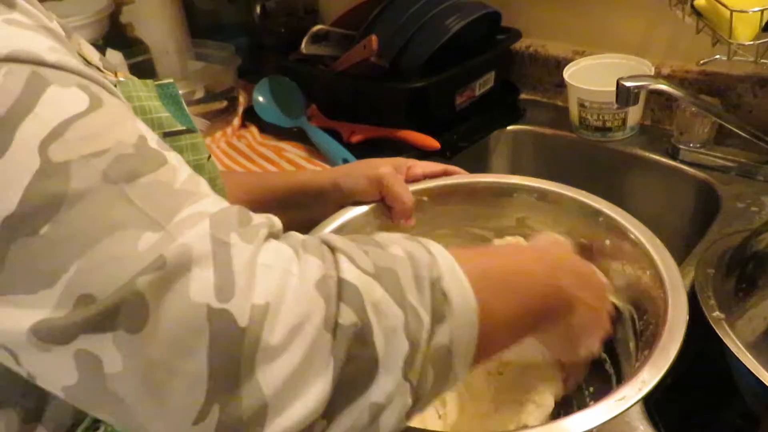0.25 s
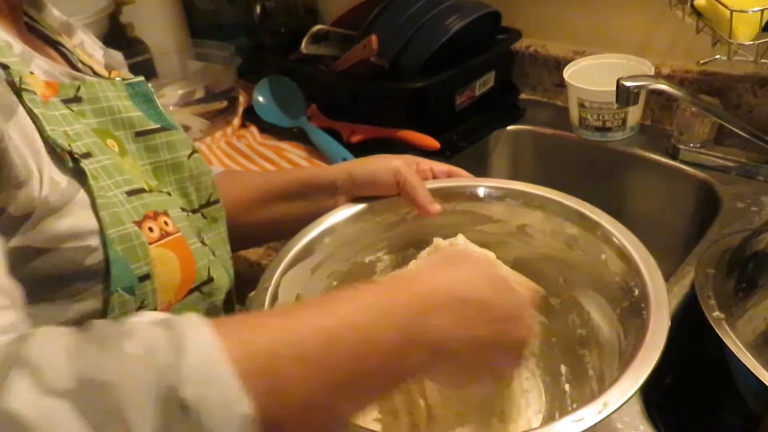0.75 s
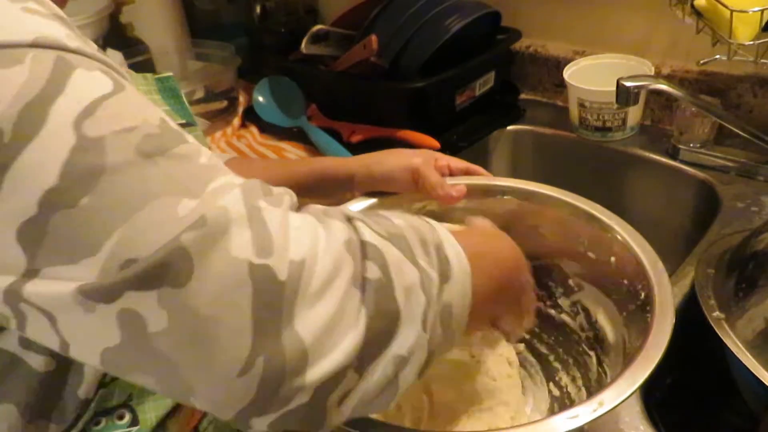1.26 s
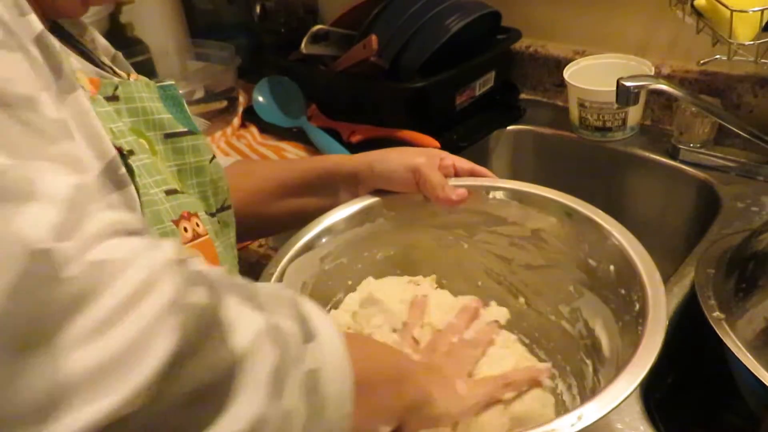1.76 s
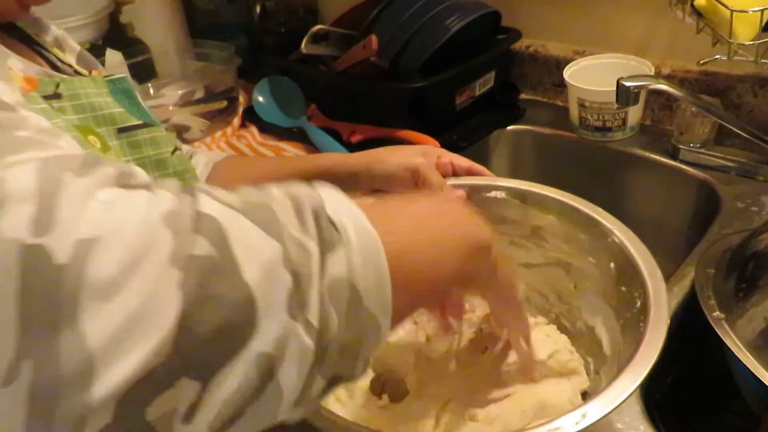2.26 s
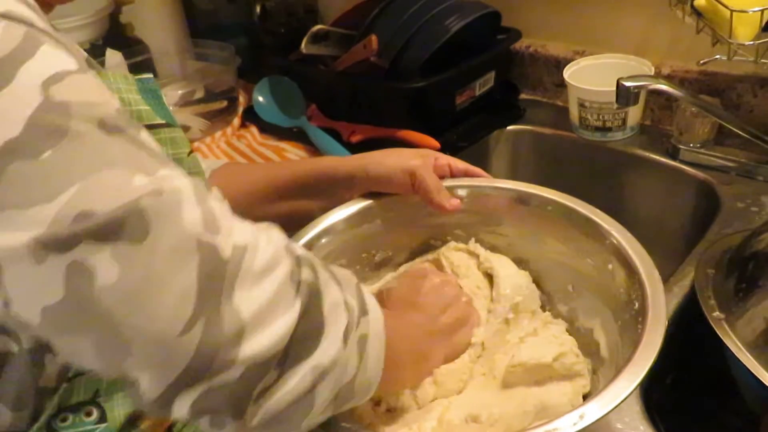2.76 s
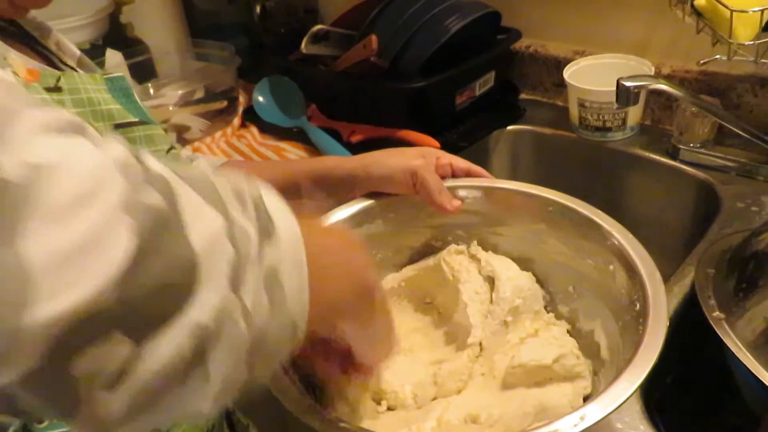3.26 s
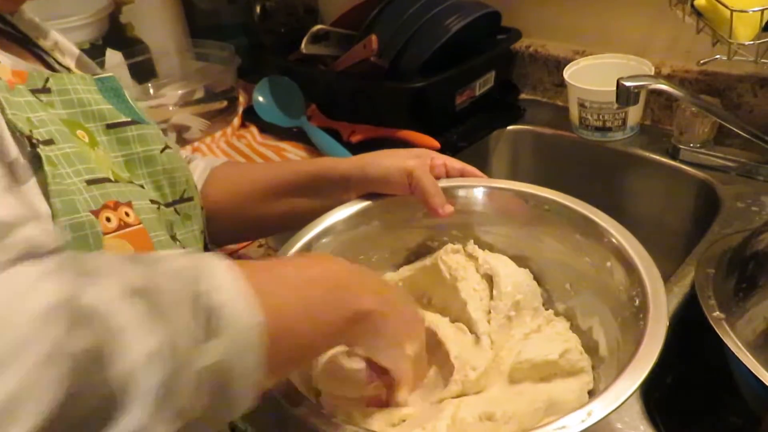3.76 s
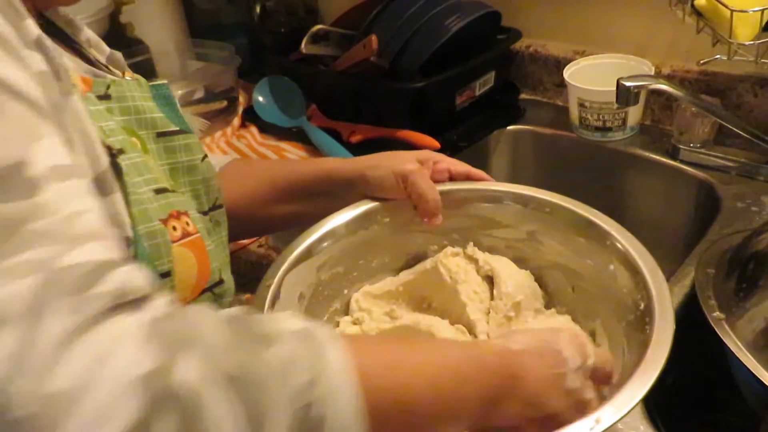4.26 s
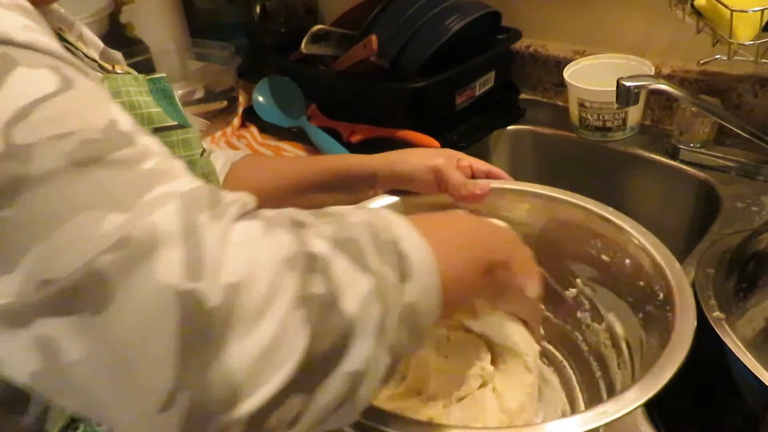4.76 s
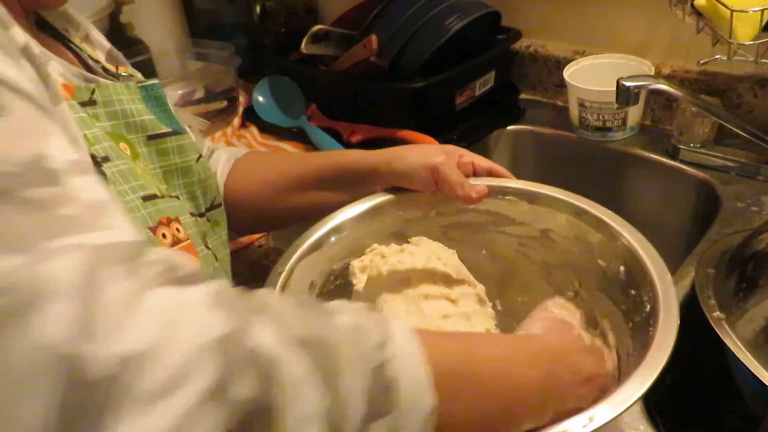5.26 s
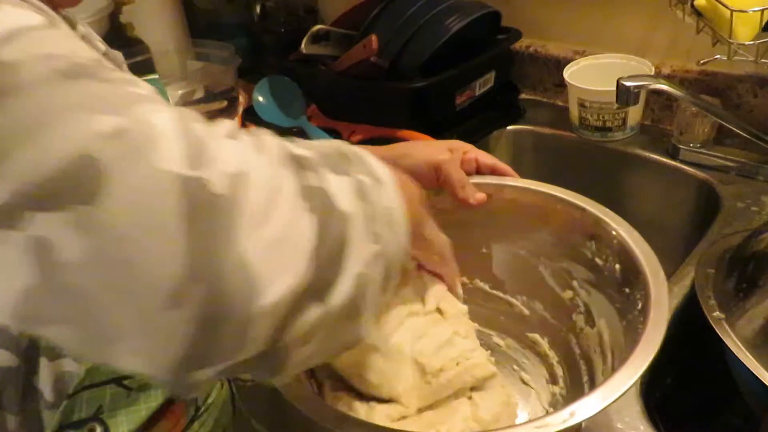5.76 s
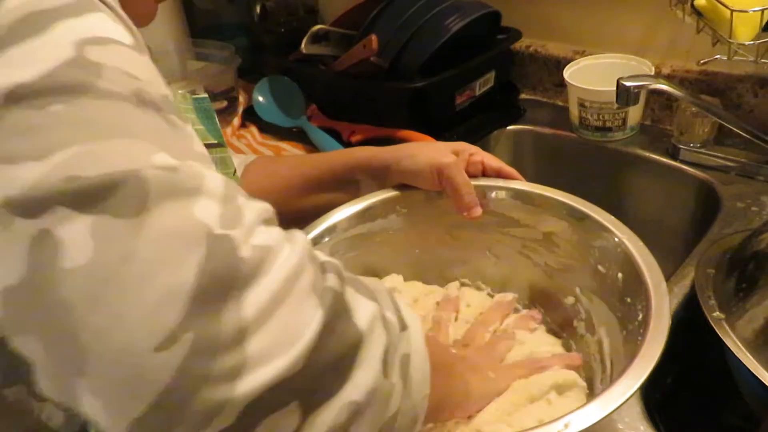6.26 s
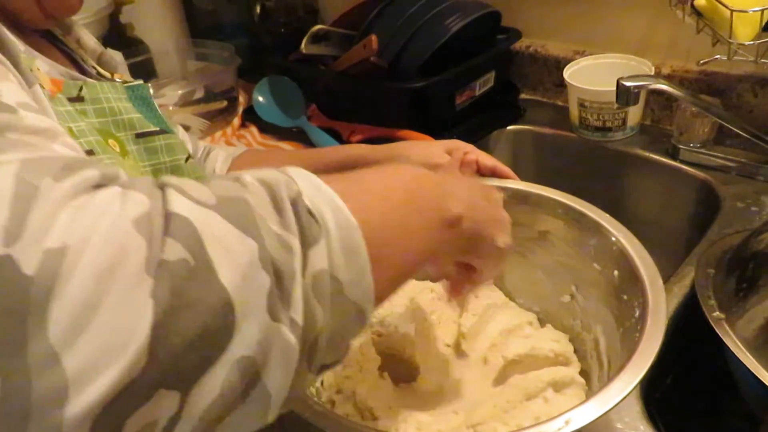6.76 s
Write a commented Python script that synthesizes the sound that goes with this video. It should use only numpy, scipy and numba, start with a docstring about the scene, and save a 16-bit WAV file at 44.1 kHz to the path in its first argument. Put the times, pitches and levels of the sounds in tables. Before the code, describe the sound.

Hands knead sticky dough in a large steel bowl beside a kitchen sink. Pushes thump the bowl with a dull, short metallic boom, hardest just after two seconds. A quieter middle has soft pats, rubbing and wet snaps, then the thumps return near five seconds. Close stereo microphones, a small hard kitchen, low hum and a faint engine far outside.

```python
"""Dough is kneaded by hand in a big steel bowl on the edge of a kitchen sink, heard by two close microphones.
Each push thumps the bowl down: damped modes ring over a crack and a longer wash of noise.
Between pushes come soft pats, the rub of dough and sleeve, a faint squeak, and the fizz and snaps of tearing
dough, all built from noise, clicks and small ringing pockets, with a short tail from the hard kitchen.
Far outside an engine drones, over a low hum and room air; a limiter ducks the level at the hardest thumps."""
import sys
import numpy as np
from scipy import signal
from scipy.fft import rfft, irfft, next_fast_len
from scipy.io import wavfile
from scipy.ndimage import uniform_filter1d, minimum_filter1d
from numba import njit

SR = 44100
rng = np.random.default_rng(int(sys.argv[2]) if len(sys.argv) > 2 else 0)


def dump(signal):
    """Clip the signal to [-1, 1] and save it as 16-bit WAV at the path in sys.argv[1]."""
    limited = np.clip(np.atleast_2d(signal).T, -1, 1)
    pcm = np.round(limited * 32767).astype(np.int16)
    wavfile.write(sys.argv[1], SR, pcm)


N = 309890  # samples
TIME = np.arange(N) / SR  # seconds


def undb(db):
    """Decibels to gain."""
    return 10 ** (np.asarray(db) / 20)


def unit(x):
    """Scale to rms 1."""
    return x / np.sqrt(np.mean(x ** 2))


def colour(x, points):
    """Filter by (Hz, dB) points joined on a log-frequency axis."""
    hz, db = np.transpose(points)
    size = next_fast_len(x.shape[-1] + 2048)
    f = np.maximum(np.fft.rfftfreq(size, 1 / SR), 1)
    gain = undb(np.interp(np.log(f), np.log(hz), db))
    return irfft(rfft(x, size) * gain, size)[..., :x.shape[-1]]


# How far diffuse sound differs between the two close microphones.
# Each row: frequency in Hz, side filter gain in dB.
MICROPHONE_SPREAD = [(60, -27), (110, -23), (200, -8.5), (380, -8), (700, -12), (1290, -9.5), (2380, -8.5),
                     (4400, -8.5), (8120, -5.5), (15000, 0.5)]


def widen(mid, side):
    """Left and right at the two microphones: alike in the bass, unrelated in the treble."""
    return mid + np.array([[1], [-1]]) * colour(side, MICROPHONE_SPREAD)


def diffuse(count, width=1):
    """White noise arriving from all around; a smaller width draws it toward the centre."""
    mid, side = rng.standard_normal((2, count))
    return widen(mid, width * side)


def fade(t, t60):
    """Exponential decay, falling 60 dB in t60 seconds."""
    return np.exp(-np.log(1000) * t / t60)


def walk(rate):
    """Slow chance with a spread near 1: random values, rate of them per second, joined by lines."""
    knots = rng.standard_normal(2048)
    return np.interp(TIME * rate, np.arange(len(knots)), knots)


def swell(middle, length):
    """A movement gathers speed and comes to rest again."""
    return np.sin(np.pi * np.clip((TIME - middle) / length + .5, 0, 1))


def crackle(rate, spread_db):
    """Tiny bonds breaking at random, rate of them per second: clicks of very uneven size."""
    sizes = undb(spread_db * np.minimum(rng.exponential(size=N), 5))
    mid, side = rng.standard_normal((2, N)) * sizes * (rng.random(N) < rate / SR)
    return unit(widen(mid, side))


def pockets(rate, low_hz, high_hz, cycles, spread_db):
    """Tiny air pockets open at random, each ringing for a few cycles at a pitch of its own."""
    out, t = np.zeros((2, N)), np.arange(SR // 20) / SR
    for when, pitch, size, pan in rng.random((int(rate * N / SR), 4)):
        hz = low_hz * (high_hz / low_hz) ** pitch
        envelope = t * hz * fade(t, cycles / hz)
        ring = undb(spread_db * size) * np.sin(2 * np.pi * hz * t) * envelope
        left_right = np.array([[1 + pan / 2], [1.5 - pan / 2]])
        add(out, left_right * ring, when * TIME[-1])
    return unit(out)


def resonate(x, hz, width_hz):
    """Steep band-pass: one resonance applied twice."""
    b, a = signal.iirpeak(min(hz, SR / 3), hz / min(width_hz, SR / 4), fs=SR)
    return signal.lfilter(b, a, signal.lfilter(b, a, x))


def add(track, sound, start):
    """Mix a sound into the track at a time in seconds."""
    i = max(int(start * SR), 0)
    track[:, i:i + sound.shape[-1]] += sound[..., :N - i]


# Air of the still kitchen. Each row: frequency in Hz, relative level in dB per Hz.
KITCHEN_AIR = [(12, -40), (20, -7), (65, 0), (109, -7), (144, -19.5), (213, -6), (274, -26), (342, -10),
               (580, -23), (788, -13), (931, -27), (6180, -39), (11400, -47.5), (15500, -68)]


def kitchen_air(level_db=-47):
    """Steady noise from all around, coloured by the still kitchen."""
    return undb(level_db) * unit(colour(diffuse(N), KITCHEN_AIR))


def hum(hz=61.3, waver_hz=.7, level_db=-49, waver_db=1):
    """A low sine, wavering a little in pitch and level."""
    phase = 2 * np.pi * np.cumsum(hz + waver_hz * walk(3.85)) / SR
    return unit(np.sin(phase)) * undb(level_db + waver_db * walk(7.5))


# The engine far outside speeds up, then eases off. Each row: time in seconds, firing rate in Hz.
ENGINE_SPEED = [(0, 57), (.33, 60), (.5, 64), (1, 66), (1.35, 69.5), (2.1, 79), (2.7, 91), (3, 95),
                (3.5, 104), (3.95, 106.5), (4.6, 99), (5.35, 92), (6.1, 81), (7.03, 77)]
# Kitchen resonances where the engine booms. Each row: centre in Hz, half width in Hz, boost in dB.
KITCHEN_MODES = [(66.1, 3.3, 10.5), (87.8, 11.3, 2.5)]


def engine(firing_db=-49, half_order_db=-57.5, waver_db=1.2):
    """Sines at the firing rate and half of it; the first swells as it crosses the room's resonances."""
    hz = np.interp(TIME, *np.transpose(ENGINE_SPEED))
    phase = 2 * np.pi * np.cumsum(hz) / SR
    boom_db = sum(boost * np.exp(-((hz - centre) / width) ** 2) for centre, width, boost in KITCHEN_MODES)
    firing = unit(np.sin(phase)) * undb(firing_db + boom_db + waver_db * walk(8))
    half_order = unit(np.sin(phase / 2)) * undb(half_order_db)
    return firing + half_order


def room(x, wet_db=-5, t60=0.25, gap_s=0.008):
    """Hard kitchen surfaces add a short tail of decaying noise after a small gap."""
    t = np.arange(SR // 2) / SR
    tail = diffuse(len(t)) * fade(t, t60) * (t > gap_s)
    tail /= np.sqrt(np.sum(tail ** 2) / 2)
    mono = x.mean(axis=0)[None]
    return x + undb(wet_db) * signal.fftconvolve(mono, tail, axes=1)[:, :N]


# Knuckles squeak along the steel.
# One row: middle in seconds, length in seconds, pitch in Hz, level in dB.
KNUCKLE_SQUEAK = (4.3, .075, 1090, -46)


def squeak():
    """Stick and slip of skin on steel gathers faintly in one narrow resonance."""
    middle, length, hz, db = KNUCKLE_SQUEAK
    return undb(db) * swell(middle, length) * unit(resonate(diffuse(N), hz, hz / 14))


# Small air pockets snap open close to the microphones.
# Each row: start in seconds, relative level in dB, centre in Hz, width of one resonator pass in Hz.
AIR_SNAPS = [(.208, -44, 7000, 7900), (0.313, -36, 3350, 1500), (.397, -50, 2300, 1500),
             (.409, -39, 4020, 2500), (0.455, -42, 4440, 3540), (0.6, -46, 2600, 3000),
             (1.138, -38, 2650, 700), (1.255, -39, 3700, 5000), (1.432, -43, 4200, 2500),
             (1.441, -46, 4600, 2500), (1.525, -45, 3700, 3000), (2.083, -40.5, 3900, 1800),
             (2.099, -47, 3700, 1500), (2.925, -28.5, 3670, 3150), (3.008, -42, 3100, 2200),
             (3.018, -35.5, 3300, 3000), (3.644, -40, 3900, 3000), (3.676, -40, 2900, 1500),
             (3.691, -39, 4360, 2000), (3.942, -35, 4300, 6000), (3.951, -34.5, 3500, 5030),
             (4.633, -28, 4670, 5200), (4.642, -38, 5500, 4000), (5.58, -36, 6000, 8060),
             (5.587, -38, 4700, 3500), (5.642, -34, 3680, 3500), (5.649, -47, 4200, 3000),
             (6.2, -41, 2600, 3500), (6.212, -46, 2800, 3500), (6.551, -43, 3430, 1200),
             (6.981, -44.5, 2600, 2000)]


def snaps(spread_db=4.0, rise_s=.0007, t60=.04):
    """A pocket lets go in a short run of tiny wet clicks, coloured by the hollow that opens."""
    out, t = np.zeros((2, N)), np.arange(SR // 4) / SR
    clicks = crackle(rate=15000, spread_db=spread_db)
    envelope = np.minimum(t / rise_s, 1) * fade(np.maximum(t - rise_s, 0), t60)
    for start, db, hz, width_hz in AIR_SNAPS:
        # every snap takes its own stretch of clicks
        stretch = np.roll(clicks, -int(start * SR), axis=1)[:, :len(t)]
        burst = unit(resonate(stretch, hz, width_hz))
        add(out, undb(db) * envelope * burst, start)
    return colour(out, [(200, -8), (700, 1.5), (7000, -5), (14000, -20.5)])


# Sticky dough tears off the steel and the fingers.
# Each row: middle in seconds, length in seconds, relative level in dB.
DOUGH_TEARS = [(0.457, 0.2, -55), (1.41, 0.6, -58.5), (2.163, 0.21, -51.5), (2.934, 0.037, -48.5),
               (3.028, 0.095, -47), (3.72, 0.12, -46), (4.824, 0.68, -54.5), (5.655, 0.18, -53),
               (5.887, 0.17, -58), (6.28, 0.18, -60), (6.59, 0.23, -52)]
# Fizz of that tearing. Each row: frequency in Hz, relative level in dB per Hz.
TEAR_FIZZ = [(300, -9), (1200, 1.5), (3500, 4), (7000, 1), (11000, -6.5), (13500, -13.5), (15500, -24)]


def tearing(spread_db=2, flutter_db=2, fizz_db=-1, pops_db=-4):
    """Threads break by the thousand and small pockets pop among them, loudest where the pull is fastest."""
    pull = sum(undb(db) * swell(middle, length) for middle, length, db in DOUGH_TEARS)
    threads = unit(colour(crackle(rate=9000, spread_db=spread_db), TEAR_FIZZ))
    fizz = undb(fizz_db + flutter_db * walk(70)) * threads
    pops = undb(pops_db) * pockets(rate=220, low_hz=1500, high_hz=6500, cycles=28, spread_db=20)
    return pull * (fizz + pops)


# The arm sweeps the dough along the steel. Each row: middle in seconds, length in seconds,
# relative level of the sleeve's hiss in dB, relative level of the dull drag on the bowl in dB.
ARM_STROKES = [(0.0, 0.4, -56.5, -46.5), (0.296, 0.31, -57, -57.5), (0.587, 0.27, -56.5, -46.5),
               (1.047, 0.58, -57, -51), (1.355, 0.57, -54.5, -58), (1.6, 0.28, -62, -54),
               (1.854, 0.37, -60, -52), (2.192, 0.26, -55, -41), (3.1, 0.14, -77, -49.5),
               (3.48, 0.3, -59, -69), (3.835, 0.34, -79, -46), (4.304, 0.75, -58.5, -46.5),
               (4.876, 0.41, -55, -47.5), (5.455, 0.46, -54.5, -49.5), (6.228, 0.39, -58, -53),
               (6.592, 0.27, -62, -47), (6.96, 0.33, -71, -51.5)]
# Colour of the sleeve's hiss. Each row: frequency in Hz, relative level in dB per Hz.
SLEEVE_HISS = [(300, -36), (1000, 1.5), (2500, 5), (4000, 2.5), (6500, -2.5), (9000, -10), (12500, -17),
               (16000, -26)]
# Colour of the dough's drag. Each row: frequency in Hz, relative level in dB per Hz.
DOUGH_DRAG = [(50, 1.5), (150, 0), (230, 0.5), (420, -6), (750, -8), (1200, -10.5), (2200, -24),
              (6000, -50)]


def sliding(rest_hiss_db=-61.5, rest_drag_db=-58, hiss_flutter_db=2.5, drag_flutter_db=2, squish_db=-9):
    """Hand, sleeve and dough slide in small slips: each stroke swells a fine hiss and a dull drag."""
    # cloth and dough never quite come to rest
    hiss_power, drag_power = undb(rest_hiss_db) ** 2, undb(rest_drag_db) ** 2
    for middle, length, hiss_db, drag_db in ARM_STROKES:
        speed = swell(middle, length)
        hiss_power = hiss_power + (undb(hiss_db) * speed) ** 2
        drag_power = drag_power + (undb(drag_db) * speed) ** 2
    hiss = unit(colour(crackle(rate=10000, spread_db=1.5), SLEEVE_HISS)) * undb(hiss_flutter_db * walk(45))
    drag = unit(colour(crackle(rate=2500, spread_db=1.0), DOUGH_DRAG)) * undb(drag_flutter_db * walk(30))
    # squeezed dough squishes
    squish = pockets(rate=60, low_hz=220, high_hz=1200, cycles=14, spread_db=14)
    drag = drag + undb(squish_db) * squish
    return np.sqrt(hiss_power) * hiss + np.sqrt(drag_power) * drag


# The hand pats or punches the soft dough.
# Each row: start in seconds, relative level of the thud in dB, relative level of the slap in dB.
HAND_PATS = [(0.596, -34, -42), (0.700, -32, -60), (1.883, -41, -41), (2.933, -24.5, -33),
             (3.037, -23, -31.5), (3.257, -49, -42.5), (3.273, -26, -51), (3.699, -21, -36.5),
             (3.811, -36, -56), (3.943, -22, -32), (4.187, -25.5, -52), (4.329, -29, -52),
             (6.199, -28, -39.5)]


def pats(thud_hz=172, thud_t60=0.073, rim_db=-5, slap_t60=0.14, rise_s=0.0021):
    """A soft, short thud of the dough with a little of the bowl's ring, under a slap of skin."""
    out, t = np.zeros((2, N)), np.arange(SR // 3) / SR
    skin = [(100, -24.0), (400, 3.0), (800, 2), (1300, -4.5), (2500, -16.5), (9000, -60)]  # (Hz, dB)
    rise = 1 - np.exp(-t / rise_s)
    for start, thud_db, slap_db in HAND_PATS:
        thud = np.sin(2 * np.pi * thud_hz * t) * fade(t, thud_t60)
        thud = thud + undb(rim_db) * bowl_ring(t, ring_length=1)
        slap = unit(colour(diffuse(len(t)), skin)) * fade(t, slap_t60)
        add(out, (undb(thud_db) * thud + undb(slap_db) * slap) * rise, start)
    return out


# Modes of the loaded bowl on its support; the strongest die within a few cycles. Each row: nominal
# frequency in Hz, nominal level in dB, nominal 60 dB decay in seconds; each push varies them.
BOWL_MODES = [(85.5, -24.5, 0.22), (127.5, -23.5, 0.11), (178.3, -11.5, 0.18), (193, -13.5, 0.21),
              (209.4, -8, 0.14), (215.5, -6.5, 0.14), (230.7, -12.5, .45), (324.4, -23, 0.37),
              (350, -29, 0.56), (355.4, -16.5, 0.12), (454.6, -28, 0.33), (504, -18.5, 0.17),
              (534.4, -14, 0.076), (569.5, -2.5, 0.063), (610.7, -15, 0.11), (659, -23.5, 0.32),
              (726.5, -16.5, 0.12), (776, -22.5, 0.18), (821, -34, 0.51), (848, -25.5, 0.19),
              (996, -56, 0.12), (1008, -32, 0.21), (1097, -34.5, 0.11), (1244, -35.5, 0.3),
              (1360, -30.5, 0.11), (1506, -41, .18)]


def bowl_ring(t, ring_length, travel_s=0.00454, push_s=0.0077, lobe_side=0.014, grip_s=0.15):
    """The bowl's modes, left and right; the dough lies differently at each push, shifting and damping them."""
    hz, db, t60 = np.transpose(BOWL_MODES)[:, :, None]
    size, shift, lobe = rng.standard_normal((3, len(BOWL_MODES), 1))
    # short waves depend more on where the dough sits
    db = db + 1.4 * size * np.minimum(hz / 550, 1.5)
    hz = hz * (1 + .006 * shift)
    # bending waves are slower at low pitch, so the boom follows the tick; travel_s is for 200 Hz
    age = np.maximum(t - travel_s * np.sqrt(200 / hz), 0)
    envelope = undb(db) * fade(age, t60 * ring_length) * (1 - np.exp(-age / push_s))
    mid = np.sum(envelope * np.sin(2 * np.pi * hz * age), axis=0)
    # each mode's lobes reach the two microphones slightly out of step
    side = np.sum(lobe_side * lobe * envelope * np.cos(2 * np.pi * hz * age), axis=0)
    # the hand pressing on cuts the ring short
    grip = 1 / np.sqrt(1 + (t / grip_s) ** 6)
    return grip * np.array([mid + side, mid - side])


# Thumps of the bowl, close to the microphones. Each row: start in seconds, relative level in dB,
# extra dB near 170 Hz (half of it at 90 Hz and below), near 340 Hz, near 520 Hz, near 760 Hz,
# from 1500 Hz up, ring length as a factor.
BOWL_THUMPS = [(0.446, -14.5, -0.5, 6.5, 4.5, 4, -6.5, 0.82), (0.852, -22, 5, 1.5, 2.5, 2, -2, 0.84),
               (1.396, -0.5, 4, 1.5, -2, -3.5, -4, 0.9), (1.684, -1.5, 0, -1.5, 1.5, 3.5, 3.5, 0.94),
               (2.247, 8, 1, 0, 0, 2, 2, 1.05), (2.284, -6.5, -5, -1, 8, 9, 16.5, 0.59),
               (4.894, 0, 4, 4.5, 6.5, 7, 3.5, 0.89), (5.202, -26, 3, -1, 3, -9, -23, 0.67),
               (5.247, -9.5, 7, -6, -0.5, 6, 6, 0.95), (5.692, -2.5, 5, 4.5, 5.5, -1, 0.5, 0.87),
               (6.023, -3.5, -3, -6, -3.5, -8, -9.5, 0.89), (6.626, 1.5, -3, -1, -6, -6, -4, 0.92)]
# Dense wash of the steel and the kitchen after a thump.
# Each row: frequency in Hz, relative level in dB per Hz.
THUMP_WASH = [(30, -15.5), (60, 7), (110, 0.5), (200, 5), (340, 2), (430, -1), (600, -3), (800, -7.5),
              (1200, -11), (1800, -20), (2400, -23.5), (3400, -36), (6000, -38.5), (15000, -74)]


def thumps(wash_db=-21, wash_t60=0.4, crack_db=-20, crack_t60=0.13, rise_s=0.0022):
    """The bowl hits its support: ringing modes, a short crack and a longer wash."""
    out, t = np.zeros((2, N)), np.arange(SR // 3) / SR
    for start, db, low_db, body_db, mid_db, clang_db, top_db, ring_length in BOWL_THUMPS:
        crack = undb(crack_db) * fade(t, crack_t60)
        wash = undb(wash_db) * fade(t, wash_t60 * ring_length)
        envelope = (crack + wash) * (1 - np.exp(-t / rise_s))
        ring = bowl_ring(t, ring_length)
        blow = ring + envelope * unit(colour(diffuse(len(t), width=0.41), THUMP_WASH))
        # the place and hardness of the contact weight the modes
        contact = [(90, low_db / 2), (170, low_db), (230, 0), (340, body_db),
                   (520, mid_db), (760, clang_db), (1500, top_db)]
        add(out, undb(db) * colour(blow, contact), start)
    return out


def scene(balance_db=-.55):
    """The kneading sits just right of centre, over the kitchen and the engine outside."""
    work = thumps() + room(pats() + snaps() + tearing() + squeak() + sliding())
    left_right = undb(np.array([[1], [-1]]) * balance_db / 2)
    return work * left_right + engine() + hum() + kitchen_air()


@njit
def peak_follow(x, release):
    """Envelope that jumps to each peak and sinks slowly."""
    out, e = np.empty(len(x)), 0.
    for i in range(len(x)):
        e = max(x[i], e * release)
        out[i] = e
    return out


def record(dry, ceiling_db=-2, release_s=0.69, top_hz=15400):
    """A look-ahead limiter holds the peaks and recovers slowly; the top is cut."""
    peak = peak_follow(np.abs(dry).max(axis=0), np.exp(-1 / (release_s * SR)))
    gain = np.minimum(1, undb(ceiling_db) / (peak + 1e-9))
    # look ahead about a millisecond and smooth the onset
    gain = uniform_filter1d(minimum_filter1d(gain, size=90), size=90)
    top_cut = signal.ellip(10, .1, 80, top_hz, fs=SR, output="sos")
    return signal.sosfilt(top_cut, dry * gain)


dry = scene()
out = record(dry)
dump(out)
```